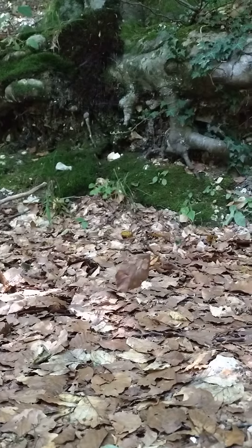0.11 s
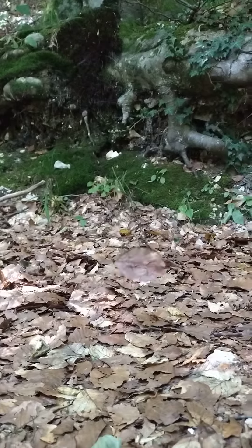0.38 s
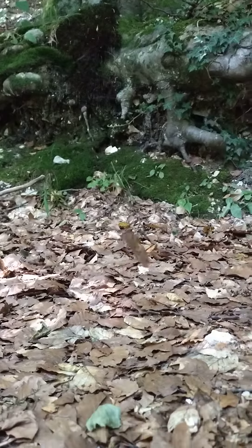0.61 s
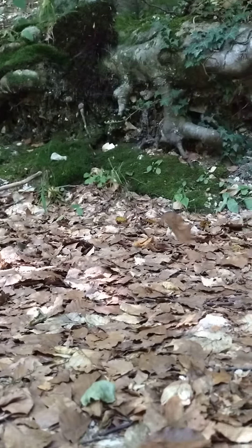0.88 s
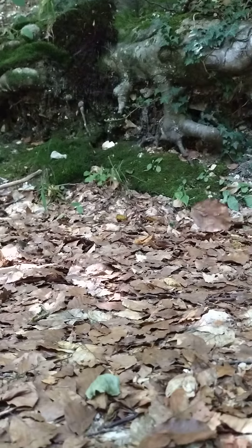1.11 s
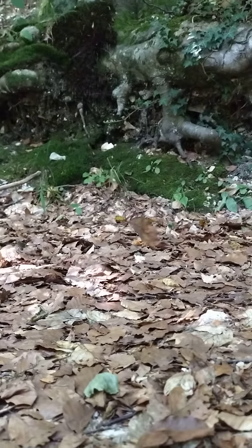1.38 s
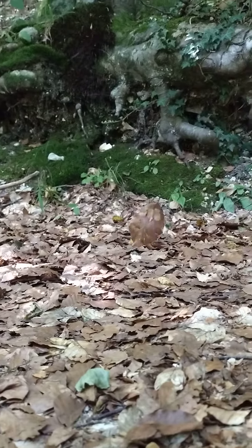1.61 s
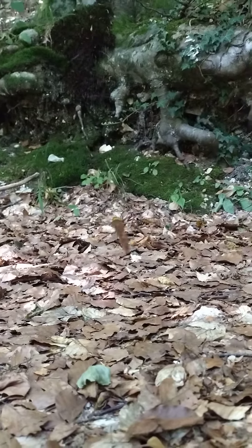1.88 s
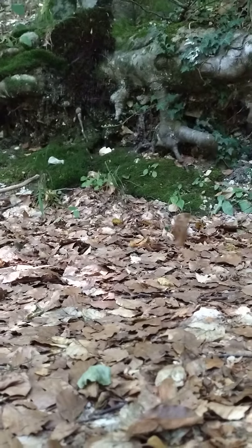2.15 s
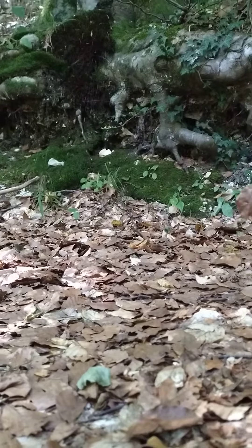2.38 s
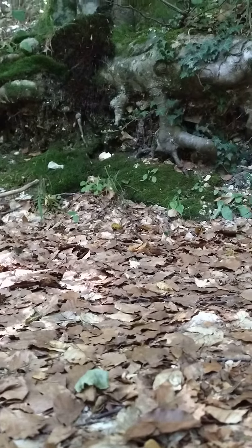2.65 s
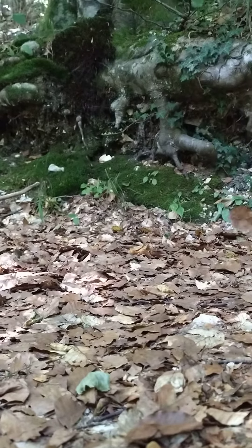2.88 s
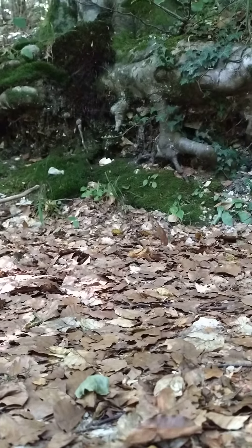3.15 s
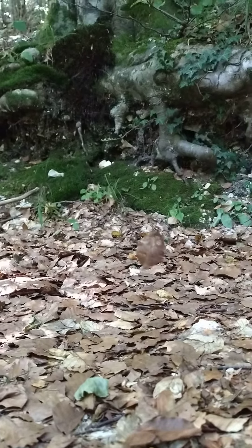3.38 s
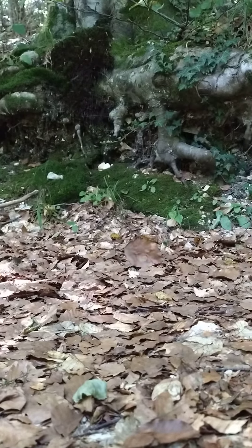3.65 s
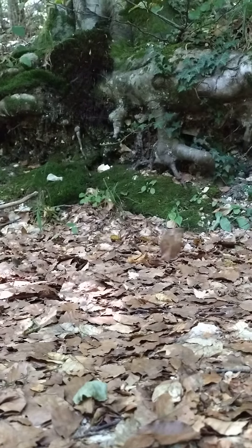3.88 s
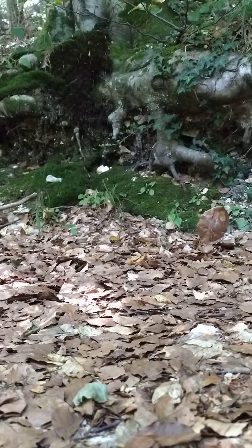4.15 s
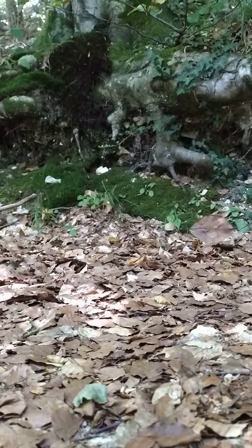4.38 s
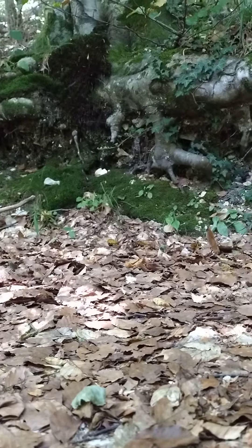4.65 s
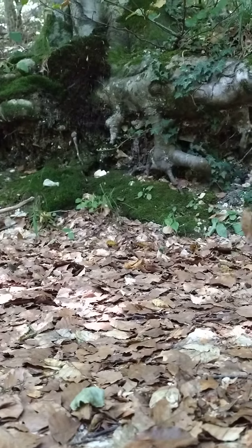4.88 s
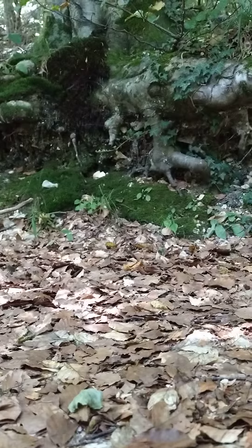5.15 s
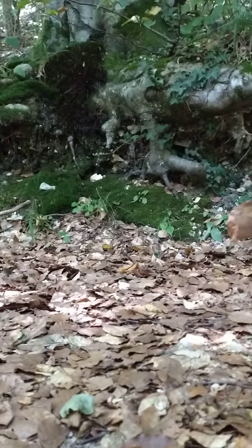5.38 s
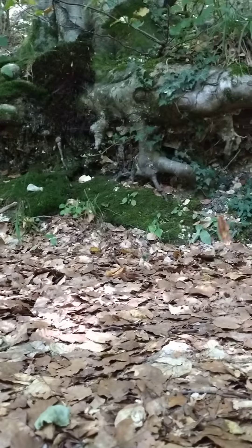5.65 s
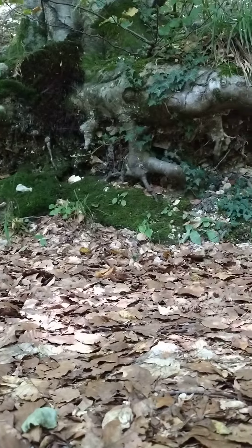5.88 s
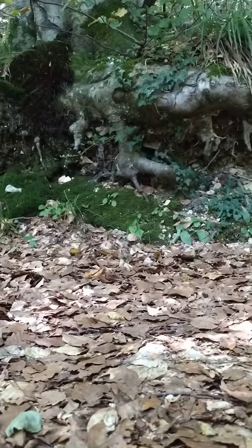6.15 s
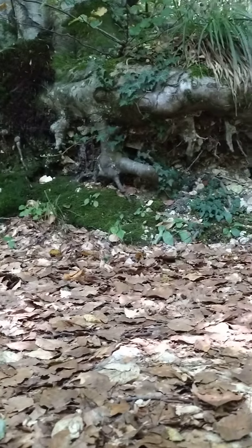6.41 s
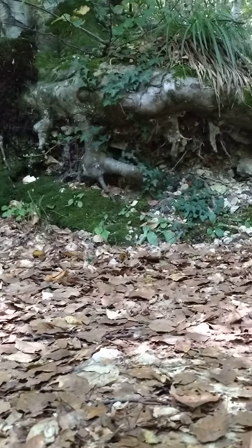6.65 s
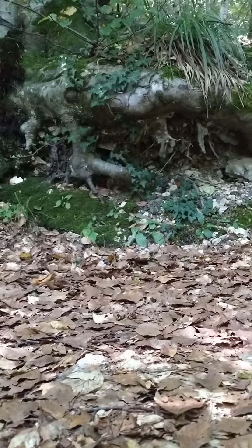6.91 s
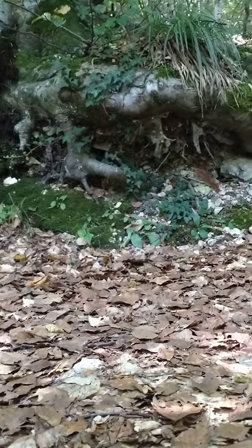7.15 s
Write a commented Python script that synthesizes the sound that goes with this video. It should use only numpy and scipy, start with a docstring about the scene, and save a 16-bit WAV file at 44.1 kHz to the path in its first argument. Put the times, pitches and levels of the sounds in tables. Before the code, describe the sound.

Phone on a woodland floor, outdoors and almost without echo. Soft breeze hiss and low rumble open alone, the hiss strongest at first. Then something stirs dry leaf litter right beside the right microphone, with crisp bright snaps, papery rustling and light muffled knocks, the left side much duller and fainter. The rustling becomes sparse, pauses, bursts once more briefly, and the breeze dies down around one last tiny snap.

```python
"""A breeze hisses in far leaves over a low rumble, strong at first, then weaker, and fades further at the end.
From 1.8 s to 4.8 s, and again from 5.2 s to 5.6 s, dry leaves are crushed and brushed in short flurries
right beside the right microphone of a phone in a wood; one last snap comes near 6.6 s.
Brittle snaps sweep down in pitch over fine crackling grains and soft low bumps made of dying sines.
The phone's body shades the left microphone by filtered, scattered paths; both ports ring near 9 kHz."""
import sys
import numpy as np
from scipy import signal
from scipy.fft import rfft, irfft, next_fast_len
from scipy.io import wavfile
from scipy.ndimage import uniform_filter1d

SR = 44100
rng = np.random.default_rng(int(sys.argv[2]) if len(sys.argv) > 2 else 0)


def to_wav(s):
    """Save 16-bit WAV."""
    ch = np.atleast_2d(s).T  # columns
    pcm = np.round(np.clip(ch, -1, 1) * 32767)  # PCM
    wavfile.write(sys.argv[1], SR, pcm.astype(np.int16))


N = 320915
PORT_GAP_S = 19 / SR  # travel time between the two microphone ports

# Spectrum of the brittle treble with the port's ring: frequency_hz, relative_level_db (per Hz)
CRISP_SPECTRUM = [(2500, -47.5), (4500, -38), (6000, -20.5), (7000, -16.5), (8000, -6.5), (9250, 1),
                  (11000, -9.5), (14200, -14.5), (17000, -14)]


def gain_of(db):
    """Amplitude ratio: 20 dB is a factor of ten."""
    return 10 ** (np.asarray(db) / 20)


def evened(x):
    """Normalisation to unit root-mean-square over all values."""
    return x / np.sqrt(np.mean(x ** 2) + 1e-20)


def smoothed_twice(x, width, axis=-1):
    """Two moving averages in a row act as a smooth low-pass filter."""
    return uniform_filter1d(uniform_filter1d(x, width, axis), width, axis)


def read(points, hz):
    """Linear interpolation of a spectrum on a logarithmic frequency axis."""
    f, value = np.transpose(points)
    return np.interp(np.log(hz + 1), np.log(f + 1), value)


def add(mix, s, sound):
    """Superposition: sounds add linearly, here from second s on."""
    part = mix[round(s * SR):][:len(sound)]
    part += sound[:len(part)]


def air():
    """Far leaves and rumble as diffuse noise: random short-time spectra, partly coherent between the ports."""
    # Mean spectrum of the air: frequency_hz, relative_level_db (per Hz)
    air_spectrum = [(21, -50), (35, -7), (107, 3), (243, -11.5), (283, -10.5), (365, -11), (674, -18),
                    (1120, -21.5), (1870, -19.5), (3810, -21.5), (4920, -18), (6510, -20), (9310, -11),
                    (13600, -31), (15500, -50)]
    # Coherence of the ports: frequency_hz, likeness (0 to 1)
    likeness = [(30, .6), (70, 1), (130, 0.81), (300, 0.53), (700, 0.59), (2000, .25), (6000, 0.11),
                (15000, 0.0562)]
    # Balance of the ports: frequency_hz, left_minus_right_db
    balance = [(60, -5), (110, 3), (200, 1), (380, -4), (700, 3), (1290, 1), (2380, 3), (4400, 1),
               (8120, -3), (15000, 2.5)]
    # Breeze in the far leaves: time_s, relative_treble_db
    breeze = [(0, 17), (.15, 14.5), (.25, 10), (1.2, 9), (3.2, 10), (5.6, 10), (5.9, 7.5), (6.2, 3.8),
              (7.3, 2.5)]
    stir_from_s, stir_to_s, stir_db = 1.9, 4.63, 5  # disturbed litter lifts the middle meanwhile
    middle_db, middle_share = 1.04, 0.5  # the middle follows the breeze less than the treble
    level_db = -59.0  # rms between 0.5 s and 1.5 s

    frames, hz = N // 256 + 5, np.fft.rfftfreq(1024, 1 / SR)
    a, b, c, d, patches = rng.standard_normal((frames, 513, 5)).T
    patches = evened(uniform_filter1d(uniform_filter1d(patches, 12, 0), 14, 1))
    t = np.arange(frames) * 256 / SR
    treble_db = np.interp(t, *np.transpose(breeze))
    stirred = uniform_filter1d(1. * (t > stir_from_s) * (t < stir_to_s), size=60)
    middle_swell_db = middle_db + middle_share * treble_db + stir_db * stirred
    # smooth shares of the band above 3 kHz and above 200 Hz
    high, low = (1 / (1 + (edge_hz / (hz + 1)) ** 3)[:, None] for edge_hz in (3000, 200))
    swell_db = high * treble_db + (low - high) * middle_swell_db

    alike = np.clip(read(likeness, hz), 0, 1)[:, None]
    left = a + 1j * b
    late = np.exp(-2j * np.pi * hz * PORT_GAP_S)[:, None]  # the air reaches the left port first
    right = alike * left * late + np.sqrt(1 - alike ** 2) * (c + 1j * d)
    tilt = gain_of(read(balance, hz) / 2)[:, None]
    spectrum_db = read(air_spectrum, hz)[:, None] + 1.4 * patches + swell_db
    spectra = np.array([left * tilt, right / tilt]) * gain_of(spectrum_db)
    out = signal.istft(spectra, nperseg=1024, noverlap=768)[1][:, :N]
    return gain_of(level_db) * out / out[:, SR // 2:SR * 3 // 2].std()


def wood(x, t60_s=0.024):
    """Reverberation: litter, trunks and the bank return an exponentially dying tail, different at each port."""
    t = np.arange(SR // 4) / SR
    tail = rng.standard_normal((2, len(t))) * gain_of(-60 * t / t60_s) * (t > .002)
    return signal.oaconvolve(x, tail / np.linalg.norm(tail[0]), axes=1)[:, :N]


def shaded(x, direct=0.43, scatter_s=0.0035, shift_s=0.019, waver_db=3.5, count=8):
    """Diffraction round the phone to the left port: later, duller, on scattered paths that change as leaves move."""
    # Shading by the phone's body: frequency_hz, left_re_right_db
    shade = [(100, -8.5), (400, -34.5), (1500, -27.5), (4500, -22), (8000, -30), (10500, -20.5),
             (12500, -36.5), (14500, -43.5)]
    t, hz = np.arange(2048) / SR, np.fft.rfftfreq(4096, 1 / SR)
    paths = rng.standard_normal((count, 2048)) * np.exp(-t / scatter_s) / np.sqrt(scatter_s * SR / 2)
    paths[:, 0] = direct
    delay = np.exp(-2j * np.pi * hz * (PORT_GAP_S + 512 / SR))  # 512 samples of room, cut off at the end
    paths = irfft(rfft(paths, 4096) * gain_of(read(shade, hz)) * delay)
    # one path hands over to the next every shift_s, in a cycle
    step = np.arange(N) / SR / shift_s
    turn = (step - np.arange(count)[:, None] + 1) % count - 1
    share = np.cos(np.pi / 2 * np.clip(turn, -1, 1))
    waver = evened(smoothed_twice(rng.standard_normal(N), 600))
    sent = x * share * gain_of(waver_db * waver)
    return signal.oaconvolve(sent, paths, axes=1).sum(0)[512:N + 512]


def cracks(gain_db, burst_s, colour_db, sweep_s=0.0022, echo_s=.0022, echo_db=-14):
    """Dispersion: bending waves bring the treble of a dying burst first, and the ground throws it back.
    Each row of gain_db makes one crack with its own uneven colour, scaled to peak 1."""
    t, hz = np.arange(1024) / SR, np.fft.rfftfreq(1024, 1 / SR)
    draw = rng.standard_normal((len(gain_db), 1540))
    u = t / (burst_s * np.exp(.3 * draw[:, -1:]))
    burst = draw[:, :1024] * u ** .6 * np.exp(-u)  # the crack runs up before it dies
    colour = evened(smoothed_twice(draw[:, 1024:1537], 30, 1))
    delay_s = sweep_s * np.clip(1 - hz / 17000, 0, .75)  # none at the top, level in the bass
    phase = 2 * np.pi * np.cumsum(delay_s) * SR / 1024  # the slope of phase is delay
    echo_delay_s = echo_s * np.exp(0.33 * draw[:, -3:-2])
    echo = gain_of(echo_db + 5.3 * draw[:, -2:-1]) * np.exp(-2j * np.pi * hz * echo_delay_s)
    spectrum = rfft(burst) * gain_of(gain_db + colour_db * colour)
    shape = irfft(spectrum * np.exp(-1j * phase) * (1 + echo))
    return shape / abs(shape).max(1, keepdims=True)


def grains(colour, clump_db, per_s, spread_db, burst_s, colour_db, count=18):
    """Shot noise: dense cracks at random moments, of many shapes and colours and random sizes."""
    hz = np.fft.rfftfreq(1024, 1 / SR)
    shapes = cracks(read(colour, hz) * np.ones((count, 1)), burst_s, colour_db)
    size_db = spread_db * np.minimum(rng.exponential(1, N), 3) + clump_db  # most are small
    size = gain_of(size_db) * (rng.random(N) < per_s / SR)
    kind = rng.integers(0, count, N)
    return evened(sum(signal.oaconvolve(size * (kind == k), shape)[:N] for k, shape in enumerate(shapes)))


def bumps(cycles=0.79, thud=0.28):
    """Damped oscillation: a few soft cycles swell and die, with a slower push an octave below."""
    # Soft bumps against the litter: peak_time_s, envelope_peak_db, pitch_hz
    bump_table = [(1.892, -42.5, 443), (1.91, -42.5, 505), (1.926, -44, 374), (2.089, -47, 424),
                  (2.235, -41, 336), (2.295, -33, 483), (2.352, -35, 420), (2.375, -32.5, 523),
                  (2.424, -34.5, 464), (2.531, -48, 467), (2.622, -45.5, 324), (2.725, -34, 377),
                  (2.849, -42, 500), (2.864, -24, 350), (2.978, -41.5, 750), (3.01, -40, 487),
                  (3.363, -46, 477), (3.444, -43, 450), (3.49, -36, 490), (3.69, -37, 490),
                  (3.787, -40, 484), (3.92, -37.5, 470), (3.996, -43, 448), (4.027, -46.5, 486),
                  (4.298, -38, 450), (4.702, -42.5, 437), (5.207, -40.5, 445), (5.238, -37, 390),
                  (5.259, -32, 500), (5.272, -37, 407), (5.288, -37.5, 415), (5.313, -37, 700),
                  (5.332, -46, 700)]
    t, out = np.arange(1500) / SR, np.zeros(N)
    for (s, db, hz), turn in zip(bump_table, rng.random((len(bump_table), 2))):
        u = t * hz / cycles  # the envelope peaks at u = 1
        tone = np.sin(2 * np.pi * (hz * t + turn[0]))
        push = np.sin(2 * np.pi * (.5 * hz * t + turn[1]))
        add(out, s - cycles / hz, gain_of(db) * u * np.exp(1 - u) * (tone + thud * push))
    return out


def rustle():
    """Stick-slip friction: leaves rub and crease in grains, ticks and a duller scrape that follow each push."""
    # Pushes through the litter: start_s, held_s, crisp_grains_db, low_scrape_db
    strokes = [(1.777, 0.025, -36, -51.5), (1.815, 0.06, -30, -50), (1.907, 0.026, -31, -39.5),
               (1.953, 0.036, -40, -51), (2.063, 0.021, -40, -51.5), (2.111, 0.039, -40, -57),
               (2.18, 0.042, -54, -61), (2.245, 0.07, -35, -48.5), (2.333, 0.022, -32, -41.5),
               (2.365, 0.043, -29, -42), (2.44, .08, -43, -61), (2.55, 0.0087, -43.5, -49.5),
               (2.617, 0.067, -40.5, -54.5), (2.705, 0.033, -26.5, -43), (2.755, 0.018, -49, -52),
               (2.8, 0.032, -37, -54.5), (2.85, 0.018, -28, -39), (2.895, 0.036, -49, -64),
               (2.975, 0.047, -49, -58), (3.045, 0.12, -54.5, -70), (3.157, 0.0027, -49, -49.5),
               (3.191, 0.083, -42.5, -54.5), (3.382, 0.0071, -40, -50.5), (3.405, 0.035, -44, -59),
               (3.459, 0.0078, -27, -45.5), (3.49, .04, -52, -58), (3.557, 0.016, -41.5, -65),
               (3.62, 0.037, -48.5, -66), (3.676, 0.023, -49, -51), (3.829, 0.023, -40.5, -59),
               (3.882, 0.037, -39.5, -49), (3.976, 0.016, -50, -56.5), (4.1, 0.025, -55, -73),
               (4.17, 0.018, -44, -62), (4.23, 0.027, -49, -65), (4.291, 0.025, -40, -51),
               (4.638, .012, -57, -63), (4.685, 0.024, -56, -71), (4.78, 0.068, -58, -67),
               (5.223, .018, -41, -51.5), (5.251, 0.058, -21.5, -38), (5.322, 0.022, -29, -48.5),
               (5.345, 0.026, -39.5, -58), (5.385, 0.028, -43, -63), (5.43, 0.041, -41, -62.5),
               (5.59, 0.036, -56, -71)]
    # Spectrum of the scrape: frequency_hz, relative_level_db (per Hz)
    scrape_spectrum = [(60, -29), (130, -18), (350, 1), (800, -9.5), (1500, -10.5), (3000, -11),
                       (5000, -10.5), (7000, -14), (9000, -70)]
    rise_db_per_s, settle_db_per_s = 904, 603  # every push starts fast and settles more slowly
    hard_db, light_db = -19, -36  # a hard push fuses into an even crumple, a light one stays lumpy
    dull_hz, dull_share = 11200, 0.22  # the lightest push loses this share of the treble above the edge
    ticks_db = -5  # sparse small breaks re the grains, in the lightest push

    t, crisp_level, scrape_level = np.arange(N // 32 + 1) * 32 / SR, 0, 0
    for start, held, crisp_db, scrape_db in strokes:
        before, after = np.maximum(start - t, 0), np.maximum(t - start - held, 0)
        push_db = -rise_db_per_s * before - settle_db_per_s * after
        crisp_level = crisp_level + gain_of(crisp_db + push_db)
        scrape_level = scrape_level + gain_of(scrape_db + push_db)
    crisp_level, scrape_level = (np.interp(np.arange(N) / SR, t, v) for v in (crisp_level, scrape_level))

    lumps = evened(smoothed_twice(rng.standard_normal(N), 200))
    crisp_level_db = 20 * np.log10(crisp_level + 1e-9)
    light = np.clip((hard_db - crisp_level_db) / (hard_db - light_db), .25, 1)
    clump = light * lumps
    fine = grains(CRISP_SPECTRUM, 4.3 * clump, per_s=3100, spread_db=6, burst_s=0.00025, colour_db=5)
    treble = signal.oaconvolve(fine, signal.firwin(63, dull_hz, pass_zero=False, fs=SR), "same")
    fine = fine - dull_share * light * treble
    ticks = grains(CRISP_SPECTRUM, 2.2 * clump, per_s=140, spread_db=4.0, burst_s=0.00029,
                   colour_db=5.5, count=10)
    scrape = grains(scrape_spectrum, 3.8 * clump, per_s=1200, spread_db=4, burst_s=.0007, colour_db=5.5)
    return crisp_level * (fine + gain_of(ticks_db) * light * ticks) + scrape_level * scrape


def snaps():
    """Brittle fracture: stored strain leaves as a treble crack, with a papery middle and a hollow knock behind."""
    # The breaks that stand out: crack_peak_time_s, crack_peak_db, top_octave_re_ring_db,
    # papery_middle_re_crack_peak_db, hollow_body_re_crack_peak_db
    snap_table = [(1.8064, -16, -23, -40, -28), (1.8133, -16, -23, -23, -32), (1.82, -13, -9, -33, -35),
                  (1.832, -15, -13, -31, -40), (1.84, -16, -16.5, -25, -37), (1.852, -9, -17, -34, -41),
                  (1.855, -13, -13, -19, -38), (1.8613, -11, -15.5, -31, -32), (1.8745, -8, -17, -33, -30),
                  (1.88, -12, -21, -32, -19.5), (1.8877, -21, -16, -27, -41), (1.9087, -9.5, -13, -16, -27),
                  (1.916, -6, -15, -17, -35), (1.9358, -19, -16, -14, -31), (1.951, -15.5, -17, -19, -28),
                  (1.9566, -19, -20, -10, -23), (1.9622, -12.5, -11, -13, -19), (1.9747, -19, -6, -17, -32),
                  (1.989, -26, -17, -18, -28), (2.017, -18, -16, -21, -23), (2.021, -20.5, -2, -14, -28),
                  (2.0648, -22, -8, -27, -37), (2.075, -18, -13, -36, -39), (2.0873, -20, -12, -39, -17.5),
                  (2.1138, -16, -15.5, -26, -31), (2.135, -26, -12.5, -22, -14),
                  (2.1496, -31, -19, -27, -25), (2.244, -6, -6, -25, -23.5), (2.2482, -4.5, -4, -26, -38),
                  (2.257, -15, -5, -33, -40), (2.265, -24, -22, -31, -30), (2.272, -11.5, 3, -33, -37),
                  (2.2935, -7.5, -2, -33, -22.5), (2.314, -12, -5.5, -26, -30),
                  (2.3364, -6.5, -12, -34, -20), (2.3469, -0.5, -8, -23, -23.5),
                  (2.3508, -2, -20, -22, -24), (2.3584, -10, -19, -15, -24), (2.3739, -10, -15, -15, -5.5),
                  (2.3954, -16, -6, -32, -10.5), (2.4224, 1, -4, -16, -18.5),
                  (2.4296, -17.5, -23, -28, -23), (2.4589, -18.5, -13, -27, -30),
                  (2.4633, -20.5, -18, -19, -37), (2.4831, -18, -4, -16, -24.5),
                  (2.5296, -18.5, -8.5, -11, -24.5), (2.5546, -24, -7, -23, -28),
                  (2.5907, -20, -9, -40, -43), (2.64, -9, 6, -19, -14.5), (2.6677, -2, -10, -15, -30),
                  (2.6729, -15, -2, -18, -36), (2.6824, -13, -7, -10, -38), (2.6943, -20, -9, -14, -36),
                  (2.71, -8, 10, -28, -40), (2.7178, -7.5, -7, -16, -41), (2.726, -3.5, -7, -27, -21),
                  (2.73, -12.5, -6, -8, -18), (2.7672, -25, -6, -10, -31), (2.788, -21.5, -4, -16, -33),
                  (2.8226, -17.5, -10, -12, -29), (2.83, -9, -12, -12.5, -31), (2.8445, -2, -9.5, -36, -34),
                  (2.8805, -14.5, -14, -8.5, -29), (2.891, -19.5, -7, -16, -34),
                  (2.9054, -24, -15, -25, -24), (2.9159, -9, -12, -11, -24), (2.9777, -10.5, -18, -6, -19),
                  (3.0327, -12.5, -3, -40, -42), (3.0599, -28, -11.5, -22.5, -24),
                  (3.1188, -16.5, -9, -30, -21.5), (3.1348, -17, -15, -21, -21.5),
                  (3.1428, -18, 1, -28, -41), (3.1596, -8, -34, -13.5, -24.5), (3.1924, -28, -1, -10, -36),
                  (3.2026, -12.5, 5, -21, -24.5), (3.227, -19.5, -4, -26, -29), (3.242, -28, -6, -26, -35),
                  (3.2634, -18.5, -11, -23, -39), (3.386, -9, 1, -12.5, -21.5),
                  (3.425, -13.5, -8, -16, -24), (3.429, -11.5, -8, -26, -30), (3.4396, -22, -4, -17, -25),
                  (3.463, -5.5, -2, -14.5, -25.5), (3.4722, -3, -0.5, -18.5, -36.5),
                  (3.5063, -24.5, -14, -26, -34), (3.5639, -20.5, -8, -17, -42),
                  (3.6868, -21, -10, -11, -13), (3.6926, -26, -17, -16, -19), (3.7366, -28, -15, -25, -27),
                  (3.7801, -28, -8, -20, -34), (3.8353, -27, -17, -27, -21), (3.848, -23, -3, -5, -13.5),
                  (3.871, -20.5, -5, -13, -32), (3.885, -27, -27, -24, -28), (3.8947, -15, 1, -16, -12),
                  (3.898, -2.5, 2, -23, -22.5), (3.9045, -19, -7, -9, -29), (3.984, -15.5, -13, -17, -27),
                  (4.1133, -29, 6, -20, -25), (4.1711, -13.5, -6, -16.5, -23.5),
                  (4.2155, -16.5, 2, -27, -45), (4.2335, -3.5, 6, -26, -38), (4.2396, -18, -19, -18, -39),
                  (4.255, -5.5, -8, -12, -26.5), (4.289, -22, -1, -22, -29), (4.303, -9.5, 1.5, -34, -24),
                  (4.315, -24, -9, -22, -32), (4.3565, -32.5, -8, -26, -29),
                  (4.6476, -30.5, -1.5, -13, -16), (4.6862, -32.5, -8, -21, -32),
                  (4.8254, -34, -1, -24, -29), (4.837, -33, 2, -13, -34), (5.2062, -37.5, -15.5, -25, 6.5),
                  (5.231, -2, 4.5, -22, -31), (5.235, -10, -4, -36, -32), (5.2574, -22, 3, -29, -18),
                  (5.265, -7.5, -10, -32, -24), (5.316, -13, -12, -15, -20), (5.332, -15, -15, -20, -22),
                  (5.3767, -1, -6.5, -25, -51), (5.417, -31, 0, -39.5, -41), (5.441, -9.5, 8, -31, -47),
                  (5.448, -29, 0, -24, -26), (5.465, -25, -6, -20, -32), (5.478, -31, -14.5, -21, -33),
                  (6.5587, -20, -11, -33, -47)]
    # Spectrum of the papery middle: frequency_hz, relative_level_db (per Hz)
    middle_spectrum = [(2000, -26.5), (3300, -13), (6000, -1.5), (7500, -13.5)]
    # Spectrum of the hollow body: frequency_hz, relative_level_db (per Hz)
    knock_spectrum = [(250, -24.5), (700, -6), (1500, -1), (3000, -5.5), (4500, -14), (7000, -57)]
    s, peak_db, top_db, middle_db, body_db = np.transpose(snap_table)
    hz, out, each = np.fft.rfftfreq(1024, 1 / SR), np.zeros(N), np.ones((len(s), 1))
    tilt_db = (top_db[:, None] + 10) * np.clip((hz - 10000) / 3000, 0, 1)  # bright or dull
    crisp = cracks(read(CRISP_SPECTRUM, hz) + tilt_db, burst_s=0.00037, colour_db=4.0)
    middle = cracks(read(middle_spectrum, hz) * each, burst_s=.0003, colour_db=4)
    body = cracks(read(knock_spectrum, hz) * each, burst_s=0.00061, colour_db=7.0)
    whole = crisp + gain_of(middle_db)[:, None] * middle + gain_of(body_db)[:, None] * body
    whole = np.roll(whole, 100, axis=1)  # room ahead of the onset
    crack_top = abs(crisp).argmax(1) + 100
    for at, db, sound, top in zip(s, peak_db, whole, crack_top):
        add(out, at - top / SR, gain_of(db) * sound)
    return out


def scene():
    """Superposition of near and far fields: leaves at the right port, shaded at the left, over the air."""
    leaves = snaps() + bumps() + rustle()
    ports = np.array([shaded(leaves), leaves])
    tail_gain = gain_of([[-8], [-28]])  # left, right
    return ports + tail_gain * wood(ports) + air()


def roll_off(x):
    """The treble ends steeply here."""
    return signal.sosfilt(signal.butter(12, 16460, fs=SR, output="sos"), x)


def record(dry):
    """Band limitation: the microphone path is a zero-phase filter that closes both ends of the band."""
    # Response of the microphone path: frequency_hz, gain_db
    response = [(20, -26), (45, -5), (80, 0), (13600, 0), (14500, -8), (14900, -34), (16300, -50),
                (16700, -100)]
    size = next_fast_len(N)
    gain = gain_of(read(response, np.fft.rfftfreq(size, 1 / SR)))
    closed = irfft(rfft(dry, size) * gain, size)[:, :N]
    return roll_off(closed)


dry = scene()
out = record(dry)
to_wav(out)
```